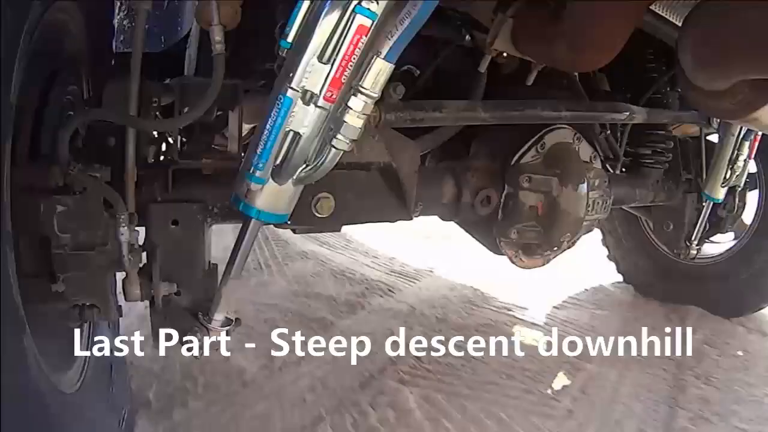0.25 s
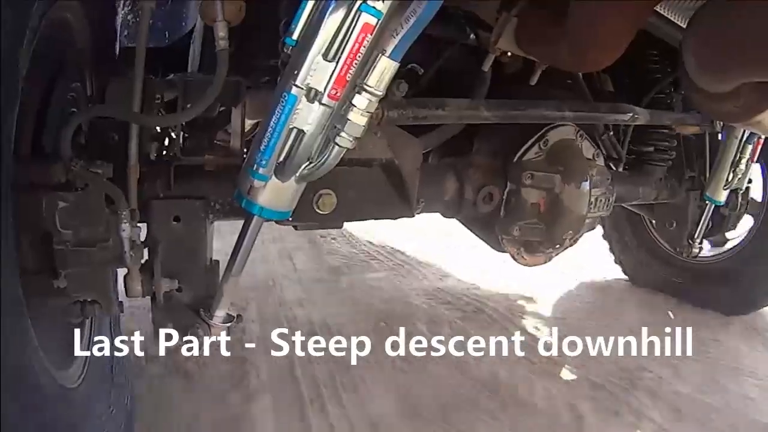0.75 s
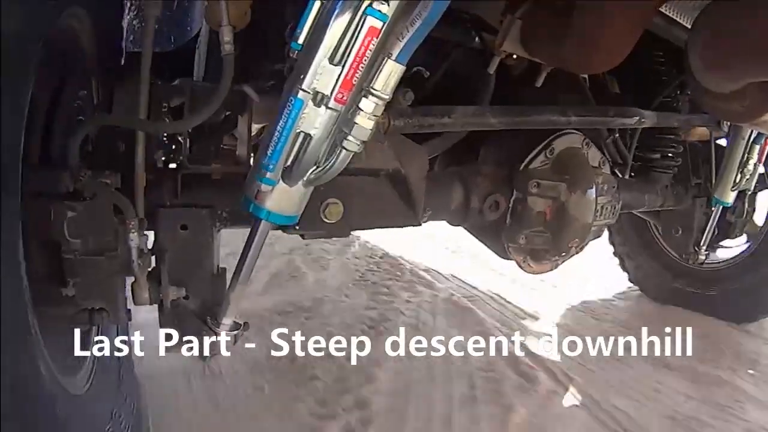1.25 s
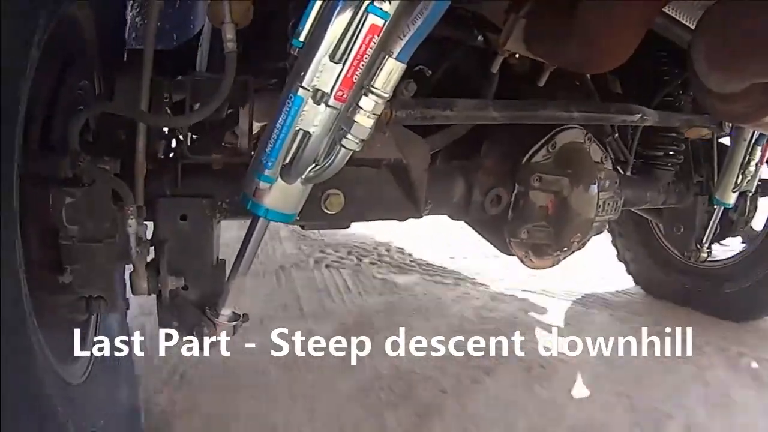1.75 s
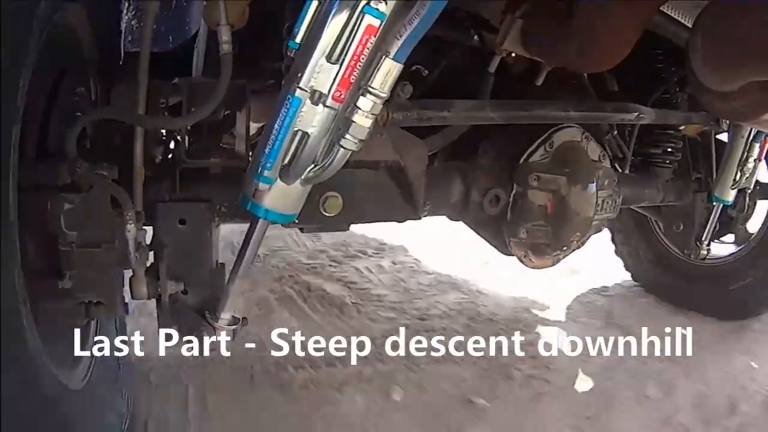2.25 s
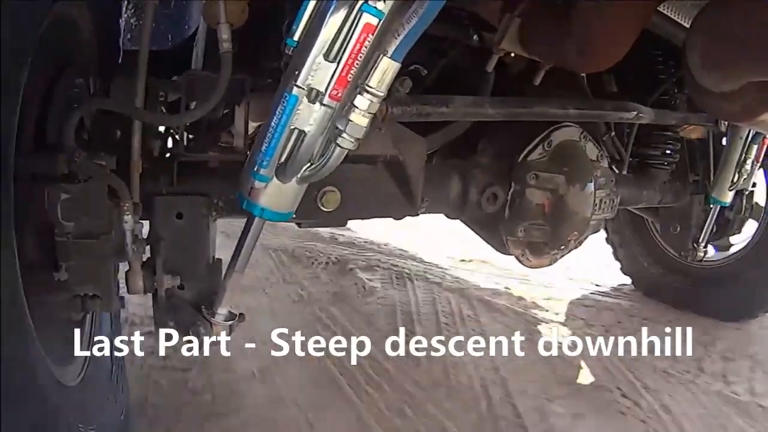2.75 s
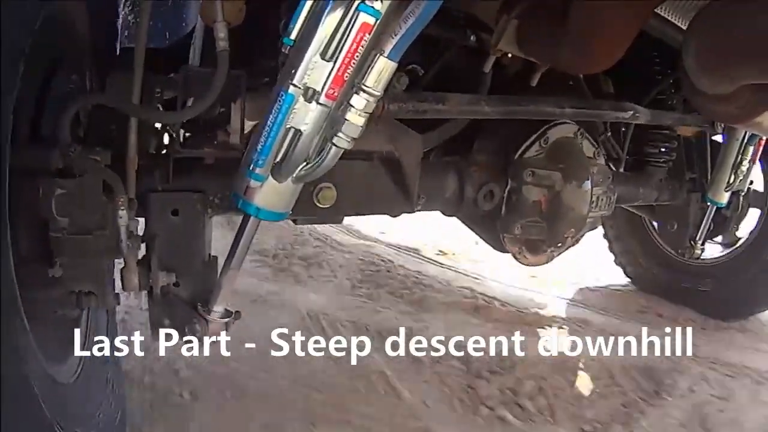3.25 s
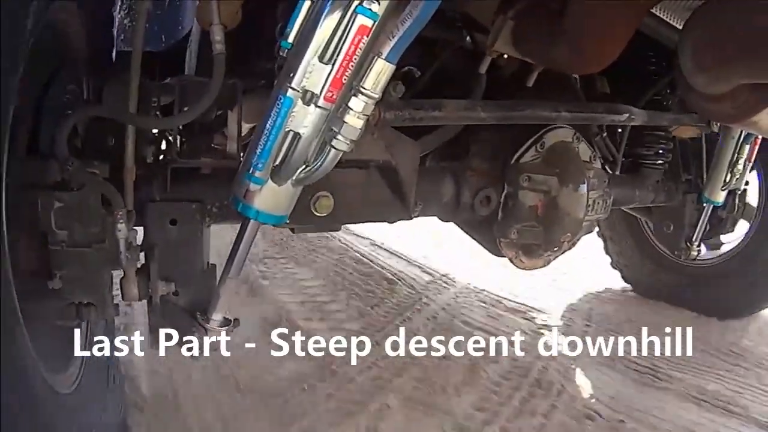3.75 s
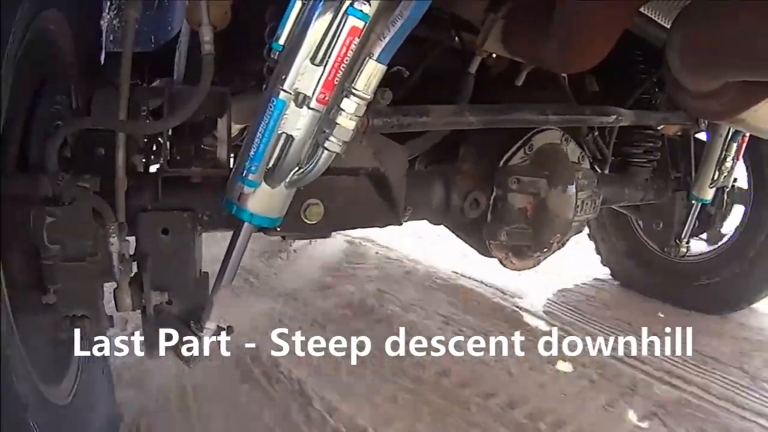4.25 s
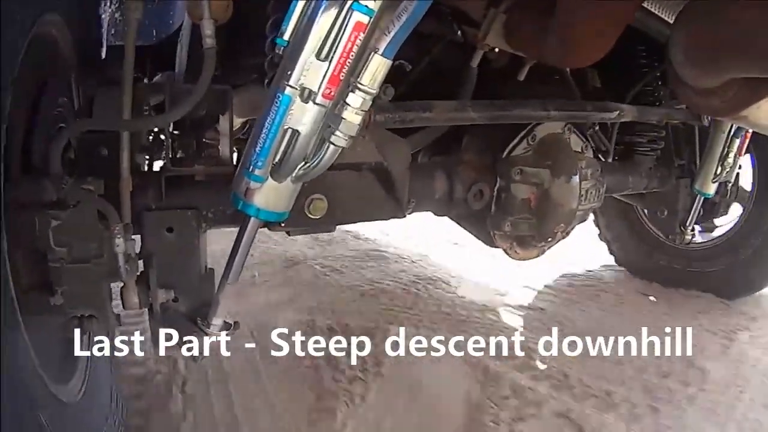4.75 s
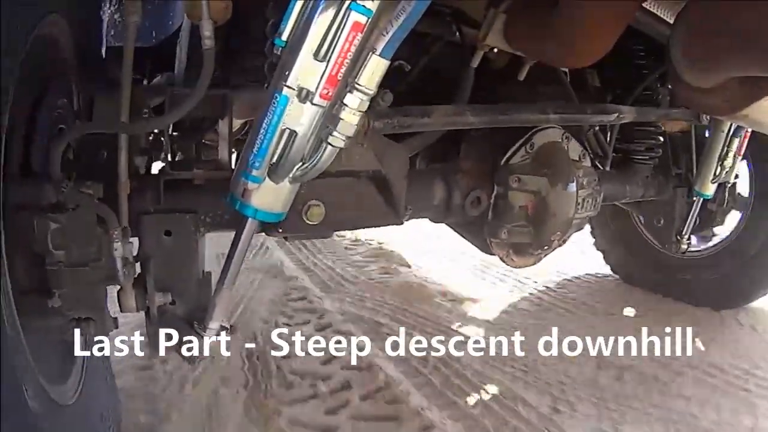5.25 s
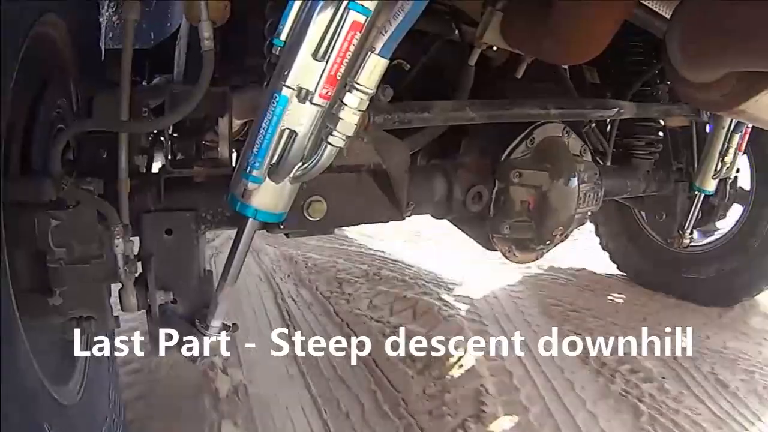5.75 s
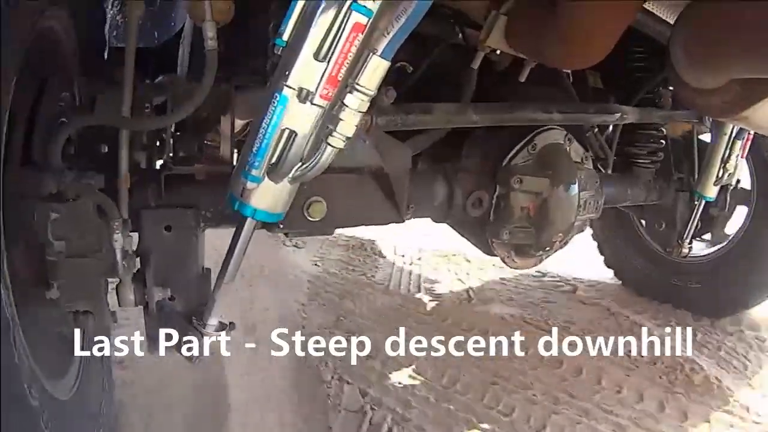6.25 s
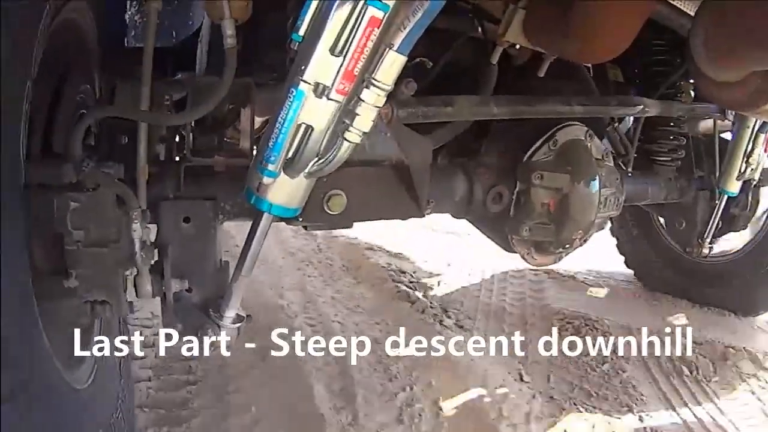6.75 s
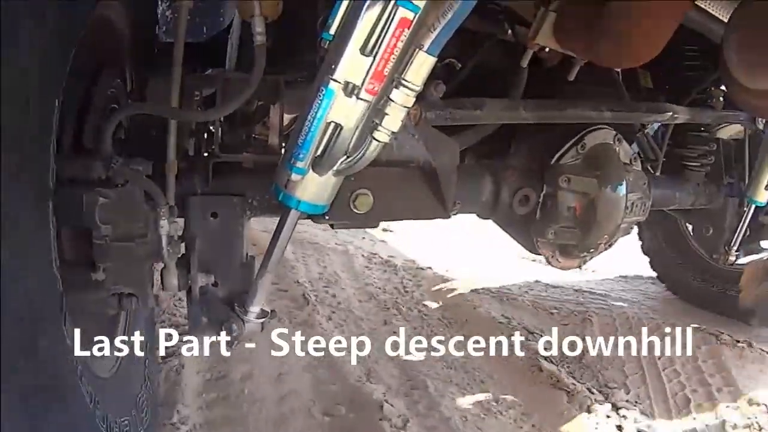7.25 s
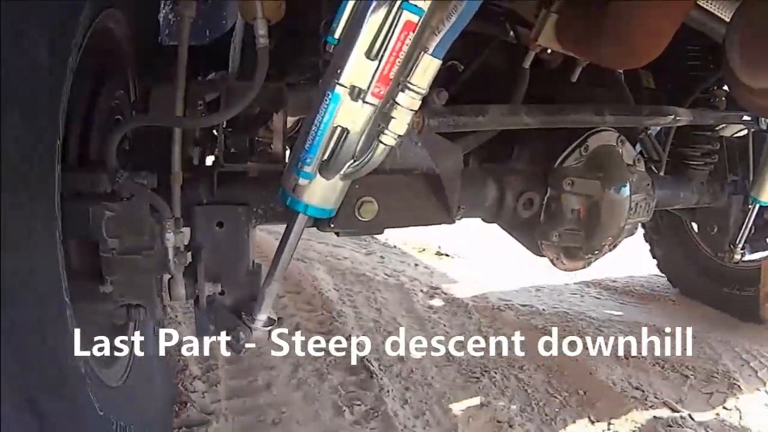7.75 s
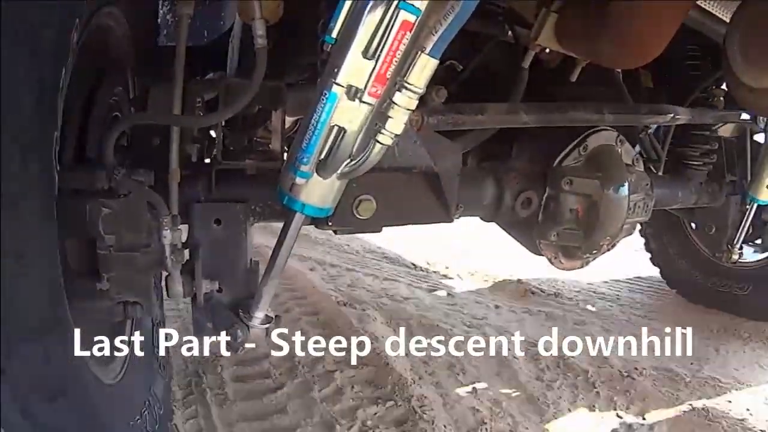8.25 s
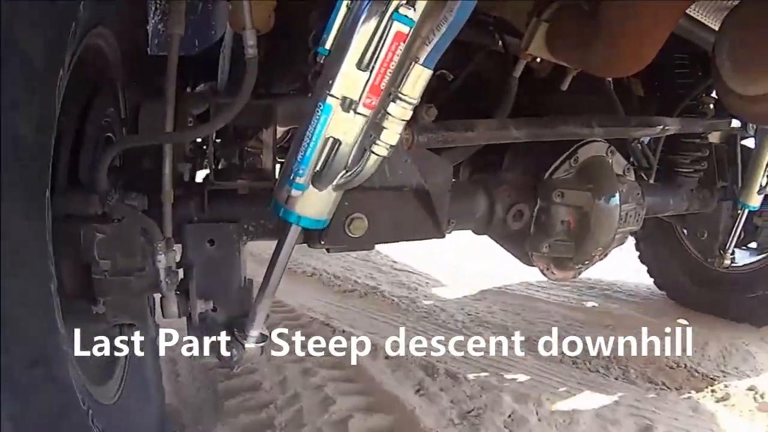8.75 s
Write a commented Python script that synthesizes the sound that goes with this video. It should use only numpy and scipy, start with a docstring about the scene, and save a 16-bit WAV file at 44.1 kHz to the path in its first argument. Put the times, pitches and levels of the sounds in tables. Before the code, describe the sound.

An underbody microphone catches a steady, buzzy engine drone and the dense rumble of tyres in dry sand. Sharp little grain ticks and dry rattles pepper the first half. Revs sink slowly, a throbbing tread drum takes over with metallic clanks, then a hushed near-idle moment with hollow tyre howl; a quick run of dull thumps brings the engine back up.

```python
"""Off-roader descending a dune

A six-cylinder off-roader runs down a sand dune, heard from a camera fixed under its body.
The engine drones as harmonics of its firing rate, sinks to idle and picks up again with a judder.
Tyres rumble and churn loose sand as filtered noise; drumming, howl and gear whines are unsteady tones.
Flung grains tick on the camera housing and the suspension knocks over the ruts as decaying modes."""
import sys
import numpy as np
from scipy import signal
from scipy.fft import rfft, irfft, next_fast_len
from scipy.io import wavfile
from scipy.ndimage import uniform_filter1d, map_coordinates

SR = 44100
rng = np.random.default_rng(int(sys.argv[2]) if len(sys.argv) > 2 else 0)


def file_out(sig):
    """Save sig as 16-bit WAV at sys.argv[1]."""
    # one column per channel
    cols = np.atleast_2d(sig).T
    # limit, then scale
    lim = np.clip(cols, -1, 1)
    pcm = np.round(lim * 32767).astype(np.int16)
    wavfile.write(sys.argv[1], SR, pcm)


N = 396884  # samples

# Engine speed. Each row: time in seconds, firings per second.
ENGINE_SPEED = [(0, 95), (.75, 100), (1.55, 104.4), (2.4, 104.4), (3, 101), (3.5, 92.5), (4, 85),
                (4.7, 76.3), (5.3, 72), (5.9, 62), (6.5, 42), (7.1, 31), (7.4, 36), (7.6, 38.3),
                (7.75, 41.3), (7.88, 42.5), (8.15, 62.5), (8.25, 71), (8.45, 77.5), (9, 79.6)]
# Engine load. Each row: time in seconds, exhaust boom in dB, overtones in dB.
ENGINE_LOAD = [(0, -29.5, -31.5), (.5, -22.5, -28), (1, -19.5, -29), (1.6, -18.5, -28), (1.9, -16.5, -39),
               (2.4, -21.5, -37), (3.5, -24, -39.5), (4.3, -37, -30), (5.2, -46, -31.5), (6, -35, -34.5),
               (6.5, -35, -44), (6.85, -54, -51), (7.2, -41, -48), (7.7, -52, -37), (8, -48, -45),
               (8.15, -31, -41), (8.3, -26, -30.5), (8.48, -20, -35), (9, -21.5, -30)]
# Engine overtones. Each row: multiple of the firing rate, relative level in dB.
ENGINE_OVERTONES = [(.5, -6), (1.5, 3), (2, -7), (2.5, -17), (3, -8.5), (3.5, -12), (4, -10), (4.5, -5.5),
                    (5, -9), (5.5, -18), (6, -6), (6.5, -17), (7.5, -16), (8, -16), (9, -24), (10.5, -27),
                    (11, -25), (12, -25)]
# Exhaust colour. Each row: frequency in Hz, gain in dB.
EXHAUST_COLOUR = [(30, -19), (80, -18.5), (220, -3.5), (330, 7.5), (390, -7), (460, 3), (540, -7.5),
                  (640, -24), (740, -3.5), (860, -19), (950, -3), (1060, 8.5), (1250, -8)]
# The gearbox sings as the engine holds the vehicle back.
# Each row: centre in seconds, length in seconds, multiple of the firing rate, level in dB.
OVERRUN_TONES = [(3.15, 0.55, 4.62, -35.5), (3.85, .5, 5.3, -41.5), (4.85, 0.94, 6.3, -39.5),
                 (5.35, .7, 4.65, -38)]
# Low overtones gain up to PULL_DB as the revs climb and lose it as they fall.
PULL_DB, PULL_HZ_PER_S = 4, 4.3
# A belt-driven accessory sings at the highest revs.
WHINE_S, WHINE_LENGTH_S, WHINE_DB = 1.88, 1.1, -39


def engine(firing_hz, phase, rough=0.08, whine_order=14.6, low_db=-3):
    """Harmonic synthesis: exhaust boom and overtones; unlike banks give the half orders."""
    boom_db, buzz_db = curves(ENGINE_LOAD)
    climb_hz_per_s = uniform_filter1d(np.gradient(curves(ENGINE_SPEED)[0]) * SR, SR // 4)
    pull_db = low_db + PULL_DB * np.tanh(climb_hz_per_s / PULL_HZ_PER_S)
    boom = amp(boom_db) * (1 + rough * wobble(23)) * np.sin(phase)
    buzz = np.zeros(N)
    for multiple, db in ENGINE_OVERTONES:
        load_db = buzz_db + pull_db if multiple <= 4 else buzz_db
        colour_db = along(EXHAUST_COLOUR, multiple * firing_hz)
        buzz += amp(load_db + db + colour_db) * partial(multiple * phase)
    whine = amp(WHINE_DB) * swell(WHINE_S, WHINE_LENGTH_S) * partial(whine_order * phase)
    overrun = np.zeros(N)
    for s, length_s, multiple, db in OVERRUN_TONES:
        overrun += amp(db) * swell(s, length_s) * partial(multiple * phase)
    return point(np.sqrt(2) * (boom + buzz + whine + overrun))


# The engine lugs at idle, then as it pulls away.
# Each row: centre in seconds, length in seconds, level in dB.
LUGGING_SPELLS = [(7.75, 1, -46), (8.037, 0.26, -32), (8.7, 0.99, -32)]
# Exhaust puffs. Each row: multiple of the firing rate, relative level in dB.
PUFF_MULTIPLES = [(2, 1), (4, -6), (7.5, -16)]


def lugging(phase):
    """Periodic excitation: low-rev exhaust puffs shake the body, so a few multiples stand out."""
    spells = sum(amp(db) * swell(s, length_s) for s, length_s, db in LUGGING_SPELLS)
    puffs = np.zeros(N)
    for multiple, db in PUFF_MULTIPLES:
        puffs += amp(db + wobble(6)) * np.sin(multiple * phase + rng.uniform(0, 2 * np.pi))
    return point(np.sqrt(2) * spells * puffs)


# Frame modes. Each row: frequency in Hz, relative level in dB, 60 dB decay time in seconds.
FRAME_MODES = [(132, -0.5, 0.052), (222, 3, .035), (298, 3, 0.047), (397, -11, 0.028), (543, 0.5, 0.028),
               (640, -5.5, 0.025)]
JUDDER_S, JUDDER_GAP_S = 8.179, .0147  # first blow, time between blows
# Level of the second, strongest blow; loss of its neighbours.
JUDDER_DB, JUDDER_ROUND_DB = -13.5, 2


def judder(count=4, scatter_db=0.5, attack_s=0.0017):
    """Impact response: taking up load, the engine rocks on the frame in a quick run of dull blows."""
    t = np.arange(SR // 12) / SR
    blows = np.zeros(N)
    for k in range(count):
        ring = struck(FRAME_MODES, t, scatter_db, detune=0.04, any_phase=True)
        level_db = JUDDER_DB - JUDDER_ROUND_DB * (k - 1) ** 2
        add(blows, JUDDER_S + k * JUDDER_GAP_S, amp(level_db) * ring * (1 - np.exp(-t / attack_s)))
    return point(blows)


# How hard the tyres roll. Each row: time in seconds, control level in dB.
ROLLING_LEVEL = [(0, -20.5), (1.2, -21), (2.15, -21), (2.8, -24), (4.1, -24.5), (6, -27.5), (6.8, -34.5),
                 (7.1, -30.5), (7.55, -36.5), (7.95, -36), (8.3, -30.5), (9, -26)]
# Churning under the tread. Each row: time in seconds, control level in dB.
CHURNING_LEVEL = [(0, -30), (.9, -30), (1.25, -32.5), (3.1, -34.5), (4.2, -32.5), (5.5, -32), (6.2, -37.5),
                  (6.65, -46.5), (7.1, -41.5), (7.5, -47.5), (8.4, -35), (9, -35.5)]
# Noise colours of low rumble, tyre rumble, churned sand and flung spray.
# Each row: frequency in Hz, relative density in dB per Hz.
LOW_RUMBLE_COLOUR = [(12, -19), (25, 4), (36, 6.5), (46, 15), (60, -3), (80, -10), (130, -77.5)]
TYRE_COLOUR = [(30, -44), (60, -14), (82, -2), (98, -3.5), (112, -1), (128, -1), (150, -5), (175, -6.5),
               (215, -5.5), (270, -7.5), (330, -9), (410, -20.5), (520, -20.5), (900, -85)]
CHURN_COLOUR = [(600, -48), (1000, -9.5), (1280, -15), (1450, -5.5), (1570, 1.5), (1700, -1.5), (1850, -8),
                (2100, -9), (2330, -16.5), (2650, -12.5), (2900, -20.5), (3250, -11), (3800, -28),
                (8000, -64)]
SPRAY_COLOUR = [(1300, -17), (2100, 15), (3200, 7.5), (4000, 1), (4700, 5), (5100, 15), (5500, 7),
                (6000, 6.5), (6700, 1.5), (7200, 5), (8200, -1), (9000, 0.5), (11000, -7.5)]
# Underbody panels. Each row: frequency in Hz, width in Hz, relative level in dB.
PANEL_MODES = [(464, 100, -9.5), (527, 67, -1.5), (628, 30.3, 4), (832, 49, -10.5), (985, 120, -16.5)]
# Four kinds of passing change: the low rumble swells or fades; the wheels throw up a fan of sand;
# sand scours the underbody; the churning briefly surges or eases.
# Each row: centre in seconds, length in seconds, level change in dB.
LOW_RUMBLE_SWELLS = [(2.55, .5, 6), (4.45, 0.78, -1), (6.1, 1.2, -0.5), (7.75, 1.5, -18), (8.6, 1.2, -3)]
SAND_FANS = [(0, 0.44, 4.5), (.85, 1, 2), (5.65, 0.69, 2), (9, 0.51, 5)]
SAND_SCRAPES = [(5.2, 0.084, 4.5), (5.88, 0.68, 4.5)]
CHURN_SURGES = [(2.99, 0.05, 2.5), (5.86, 0.068, -1), (5.945, 0.042, 6), (6.235, 0.033, 5),
                (8.21, 0.028, 6)]
CRUISE_ROLL_DB, CRUISE_SAND_DB = -25, -33  # both controls at cruising pace
# Each layer's base level at cruising pace in dB, and its growth in dB per dB of its control.
RUMBLE_DB, RUMBLE_GROWS = -20.5, 0.99
LOW_RUMBLE_DB, LOW_RUMBLE_GROWS = -32, 1.2
PANEL_DB, PANEL_GROWS = -33, 0.57
SPRAY_DB, SPRAY_GROWS = -46.5, 0.38
# Rumble below the first and above the second frequency fades faster as the tyres slow (dB per dB).
DEEP_HZ, DEEP_GROWS = 88.5, 0.42
BRIGHT_HZ, BRIGHT_GROWS = 325, 0.24


def tyres(phase, throb=0.039, churn_db=-2.0):
    """Broadband excitation: rolling shakes the body; churning sand rings its panels and sprays."""
    roll_db = curves(ROLLING_LEVEL)[0] - CRUISE_ROLL_DB
    sand_db = curves(CHURNING_LEVEL)[0]
    dig_db = sand_db - CRUISE_SAND_DB
    low_rumble_db = LOW_RUMBLE_DB + LOW_RUMBLE_GROWS * roll_db + swells(LOW_RUMBLE_SWELLS)
    low_rumble = amp(low_rumble_db) * coloured(LOW_RUMBLE_COLOUR)

    rolling = coloured(TYRE_COLOUR)
    deep = filtered(rolling, lambda hz: 1 / (1 + (hz / DEEP_HZ) ** 8))
    bright = filtered(rolling, lambda hz: 1 - 1 / (1 + (hz / BRIGHT_HZ) ** 16))
    middle = rolling - deep - bright
    deep_gain = amp(DEEP_GROWS * roll_db)
    bright_gain = amp(BRIGHT_GROWS * np.minimum(roll_db, 0))
    rumble_db = RUMBLE_DB + RUMBLE_GROWS * roll_db + 1.7 * wobble(22)
    rumble = amp(rumble_db) * (middle + deep_gain * deep + bright_gain * bright)

    unevenness = wobble(25)  # lumps of sand give way unevenly
    panel_db = PANEL_DB + PANEL_GROWS * dig_db + swells(SAND_SCRAPES) + 1.46 * unevenness
    panels = amp(panel_db) * rush(lambda hz: body(PANEL_MODES, hz))
    surge_db = swells(CHURN_SURGES) + 1.52 * unevenness + 0.53 * wobble(120)
    firing_throb = 1 + throb * np.sin(phase)
    churn = amp(sand_db + churn_db + surge_db) * firing_throb * coloured(CHURN_COLOUR)
    flicker_db = 1.3 * wobble(15) + 1.63 * wobble(200)
    spray_db = SPRAY_DB + SPRAY_GROWS * dig_db + swells(SAND_FANS) + flicker_db
    spray = amp(spray_db) * coloured(SPRAY_COLOUR)
    return low_rumble + rumble + panels + churn + spray


# The tread blocks drum. Each row: centre in seconds, length in seconds, level in dB.
DRUMMING_SPELLS = [(4.6, 1.18, -20.5), (5.455, 0.54, -24.5), (6.45, 0.77, -29.5), (7.2, 0.49, -43),
                   (7.92, 0.42, -28.5)]
TREAD_HZ = 113.5  # mean pitch


def tread(slip=0.038, depth_db=3):
    """Frequency modulation: the tread drums in spells, unsteady as the tyres grip and slip."""
    spells = sum(amp(db) * swell(s, length_s) for s, length_s, db in DRUMMING_SPELLS)
    turn = 2 * np.pi * np.cumsum(TREAD_HZ * (1 + slip * wobble(14))) / SR
    return point(spells * amp(depth_db * wobble(11)) * np.sin(turn))


# Tyre howl. Each row: time in seconds, mean pitch in Hz.
HOWL_PITCH = [(6.3, 250), (6.55, 268), (7, 255), (7.18, 278), (7.33, 253), (7.55, 246), (7.8, 228),
              (8, 226), (8.35, 255), (8.9, 275)]
HOWL_S, HOWL_LENGTH_S = 8, 3.4


def howl(howl_db=-3, slip=.015):
    """Frequency modulation: a hollow low-speed tyre howl that grows with the rolling."""
    turn = 2 * np.pi * np.cumsum(curves(HOWL_PITCH)[0] * (1 + slip * wobble(16))) / SR
    level = amp(curves(ROLLING_LEVEL)[0] + howl_db) * swell(HOWL_S, HOWL_LENGTH_S)
    return point(np.sqrt(2) * level * partial(turn))


# Breaking sand. Each row: frequency in Hz, width in Hz, relative level in dB.
CRUST_MODES = [(897, 176, 3.5), (1007, 180, 1), (1618, 150, 5.5), (2560, 100, -12.5)]
# Stretches of crusted sand. Each row: centre in seconds, length in seconds, level change in dB.
CRUSTED_STRETCHES = [(.4, 1.8, 4), (5, 2.2, 2)]


def crunch(rate=110, crunch_db=-11.0, spread_db=5):
    """Random impulse train: crusts of sand break under the tread in small, dull cracks."""
    chance, size = rng.random((2, N)), rng.uniform(-1.8, 1.6, (2, N))
    cracks = (chance < rate / SR) * np.sign(size) * amp(spread_db * np.abs(size))
    muffle = lambda hz: amp(along([(2500, 0), (4500, -18), (9000, -45)], hz))
    dull = filtered(cracks, lambda hz: resonances(CRUST_MODES, hz) * muffle(hz))
    level_db = curves(CHURNING_LEVEL)[0] + crunch_db + swells(CRUSTED_STRETCHES)
    return amp(level_db) * unit(dull)


# Suspension knocks. Each row: start in seconds, relative clank level in dB, relative thud level in dB.
SUSPENSION_KNOCKS = [(2.09, -41, -15), (2.186, -36, -16), (3.8, -35, -19), (4.17, -32, -18.5),
                     (4.59, -24, -41), (4.675, -30, -16), (4.84, -36, -23), (5.256, -22, -17),
                     (5.755, -17, -36), (5.875, -20, -27), (5.931, -22.5, -21), (6.003, -32, -15),
                     (6.504, -34, -24), (6.624, -35, -19), (6.715, -36, -32), (7.156, -21.5, -39)]
# Struck steel. Each row: frequency in Hz, relative level in dB, 60 dB decay time in seconds.
STEEL_MODES = [(510, -6.5, 0.14), (632, 7.5, 0.069), (810, -6, 0.035)]
# Axle. Each row: frequency in Hz, width in Hz, relative level in dB.
AXLE_MODES = [(114, 19.5, 8), (155, 35, 4), (286, 41, 7.5)]
# A loose joint strikes again after about this long, this much weaker.
BOUNCE_S, BOUNCE_LOSS_DB = .014, 6.5


def knocks(thud_db=12, thud_t60=.02, scatter_db=2, count=3):
    """Modal impact: joints strike and bounce; the steel rings and a push shakes the axle."""
    t = np.arange(SR // 8) / SR
    clanks, thuds = np.zeros((2, N))
    onset = 1 - np.exp(-t / 0.0044)
    for start, clank_db, push_db in SUSPENSION_KNOCKS:
        for k in range(count):
            s = start + k * BOUNCE_S * rng.normal(1, 0.134)
            loss_db = k * BOUNCE_LOSS_DB
            ring = struck(STEEL_MODES, t, scatter_db, detune=0.015)
            add(clanks, s, amp(clank_db - loss_db) * ring * onset)
            add(thuds, s, amp(push_db - loss_db + thud_db - 60 * t / thud_t60))
    return point(clanks + filtered(thuds, lambda hz: resonances(AXLE_MODES, hz)))


# Grains on the housing. Each row: start in seconds, relative ring level in dB, relative crack level in dB.
GRAIN_TICKS = [(0.4076, -20, -40), (0.6624, -31, -58), (0.7328, -48, -37), (0.821, -16, -40.5),
               (0.873, -17.5, -38), (0.9202, -19, -35.5), (1.299, -28.5, -56), (1.3937, -29, -49),
               (1.4386, -28, -51), (1.5184, -32, -52), (1.8577, -25.5, -45), (1.8763, -22, -39.5),
               (1.922, -23, -50), (2.0128, -31, -56), (2.332, -22, -46), (2.4354, -31, -54),
               (2.4832, -33, -33.5), (2.4967, -24, -44), (2.7263, -27, -46), (2.834, -19.5, -43),
               (2.8787, -28.5, -55), (2.927, -28.5, -60), (3.0632, -33, -43), (3.2964, -28.5, -47),
               (3.3378, -32, -57), (3.4016, -21, -46), (3.687, -33, -59), (3.7287, -28, -54),
               (3.7599, -33, -53), (3.7753, -22, -40), (3.8127, -35, -58), (3.8661, -30, -58),
               (4.0545, -17.5, -42), (4.1158, -23, -47), (4.1774, -38, -58), (4.2103, -28.5, -46),
               (4.259, -30, -49), (4.3101, -32, -62), (6.099, -46, -44), (6.335, -50, -48),
               (6.974, -26.5, -48), (7.1242, -31, -61), (7.365, -55, -44), (7.958, -55, -46)]
# Camera housing. Each row: frequency in Hz, relative level in dB, 60 dB decay time in seconds.
HOUSING_MODES = [(2440, -3, 0.011), (3110, -0.5, 0.007), (4180, -11.5, 0.013), (4900, -13.5, 0.021),
                 (5140, 2.5, 0.013), (6240, -13, 0.01)]
# Colour of a grain's crack. Each row: frequency in Hz, gain in dB.
CRACK_COLOUR = [(2000, 0), (5200, 2), (8000, -1.5), (11000, -6)]
RING_DB, CRACK_DB, CRACK_T60_S, TICK_ATTACK_S = 2.5, 15.5, 0.0058, 0.00029
FAST_UNTIL_S = 3.3  # fine grains fly until the wheels slow down


def grit(count=36, fine_db=-39, spread_db=5, fine_crack_db=-18, detune=0.0057):
    """Modal impact: each grain cracks on the housing and rings it; fine ones fly at speed."""
    t = np.arange(SR // 25) / SR
    rings, cracks = np.zeros(N), np.zeros((2, N))
    fine = []
    for when, size in rng.random((count, 2)):
        db = fine_db + spread_db * (2 * size - 1)
        fine.append((FAST_UNTIL_S * when, db, db + fine_crack_db))
    onset = 1 - np.exp(-t / TICK_ATTACK_S)
    for s, db, snap_db in list(GRAIN_TICKS) + fine:
        ring = struck(HOUSING_MODES, t, 1.65, detune)
        add(rings, s, amp(db + RING_DB) * ring * onset)
        decay = amp(snap_db + CRACK_DB - 60 * t / CRACK_T60_S)
        for part in cracks:
            add(part, s, decay * rng.standard_normal(len(t)) * onset)
    return filtered(cracks, lambda hz: amp(along(CRACK_COLOUR, hz))) + point(rings)


# The bracket clacks. Each row: start in seconds, relative level in dB.
BRACKET_CLACKS = [(1.898, -34), (1.96, -30), (1.998, -37), (2.066, -31), (2.094, -30.5), (2.124, -24.5),
                  (2.185, -27.5), (2.229, -26.5), (2.281, -30.5), (2.357, -30), (2.412, -32), (2.456, -30),
                  (2.508, -30.5), (2.57, -34.5), (2.619, -36), (2.687, -27), (2.745, -35), (2.96, -26),
                  (3.017, -36), (3.315, -33), (3.376, -30), (4.15, -32), (5.11, -32), (5.51, -31),
                  (5.55, -36), (5.6, -34)]
# Bracket. Each row: frequency in Hz, width in Hz, relative level in dB.
BRACKET_MODES = [(800, 130, -2.5), (950, 120, 4.5), (1170, 190, -2), (1600, 240, -3)]


def rattling(clack_db=-8, attack_s=.003, t60=0.042):
    """Damped contact: a loose bracket clacks over the ripples in short, dry, toneless bursts."""
    t = np.arange(SR // 25) / SR
    shape = (1 - np.exp(-t / attack_s)) * amp(-60 * t / t60)
    clacks = np.zeros((2, N))
    for part, ringing in zip(clacks, rush(lambda hz: body(BRACKET_MODES, hz))):
        for s, db in BRACKET_CLACKS:
            burst = unit(ringing[round(s * SR):][:len(t)] * shape)
            add(part, s, amp(db + clack_db) * burst)
    return clacks


def clatter(phase, clatter_db=-7, scatter=0.29, count=6):
    """Impulse response: firings tap the block, unequal by cylinder; level follows the churning."""
    at = np.flatnonzero(np.diff(np.floor(phase / (2 * np.pi))))
    cylinders = np.resize(rng.standard_normal(count), len(at))
    taps = np.zeros(N)
    taps[at] = cylinders + scatter * rng.standard_normal(len(at))
    t = np.arange(SR // 50) / SR
    ring = signal.fftconvolve(taps, rng.standard_normal(len(t)) * np.exp(-t / 0.021))[:N]
    tinted = unit(filtered(ring, lambda hz: amp(along(CHURN_COLOUR, hz))))
    return point(amp(curves(CHURNING_LEVEL)[0] + clatter_db) * tinted)


# Drivetrain whine at a crawl. Each row: time in seconds, pitch in Hz.
GEAR_PITCH = [(6.8, 345), (6.92, 358), (7.02, 385), (7.1, 420), (7.16, 422), (7.22, 385), (7.3, 352),
              (7.42, 335), (7.55, 345), (7.66, 372), (7.78, 372), (7.9, 335)]
GEAR_S, GEAR_LENGTH_S, GEAR_DB = 7.35, 1.2, -39.5
# Another gear pair: its pitch over the first, its level against it.
SECOND_MESH, SECOND_MESH_DB = .815, -6
# A wavering whistle, and a thin steady whine as of a pump; levels relative to the churning control.
WHISTLE_HZ, WHISTLE_WANDER_HZ, WHISTLE_DB = 1616, 54.95, -6
THIN_HZ, THIN_DB = 2690, -22
SING_S, SING_LENGTH_S, SING_HZ, SING_DB = 5.15, 0.49, 850, -40.5  # a panel sings briefly


def whines():
    """Narrow-band tones: two gear meshes at a crawl, a whistle, a thin whine, a panel."""
    turn = 2 * np.pi * np.cumsum(curves(GEAR_PITCH)[0]) / SR
    meshes = np.sqrt(2) * (np.sin(turn) + amp(SECOND_MESH_DB) * np.sin(SECOND_MESH * turn))
    gear = amp(GEAR_DB + 1.6 * wobble(10)) * swell(GEAR_S, GEAR_LENGTH_S) * meshes
    sand_db = curves(CHURNING_LEVEL)[0]
    whistle_tone = wavering(WHISTLE_HZ, WHISTLE_WANDER_HZ, rate=19)
    whistle = amp(sand_db + WHISTLE_DB + 1.9 * wobble(14)) * whistle_tone
    thin_tone = wavering(THIN_HZ, wander_hz=7.8, rate=15)
    thin = amp(sand_db + THIN_DB + 3.4 * wobble(6.9)) * thin_tone
    panel_tone = wavering(SING_HZ, wander_hz=24, rate=45)
    panel = amp(SING_DB) * swell(SING_S, SING_LENGTH_S) * panel_tone
    return point(gear + whistle + thin + panel)


def partial(phase, flutter_db=2, waver_rad=.3):
    """Amplitude and phase modulation: one tone whose level and phase wander."""
    wander = waver_rad * wobble(13)
    return amp(flutter_db * wobble(11)) * np.sin(phase + wander + rng.uniform(0, 2 * np.pi))


def wavering(hz, wander_hz, rate):
    """Frequency modulation: a tone of rms 1 whose pitch wanders, rate knots a second."""
    return np.sqrt(2) * np.sin(2 * np.pi * np.cumsum(hz + wander_hz * wobble(rate)) / SR)


def struck(modes, t, scatter_db, detune, any_phase=False):
    """Modal superposition: decaying sines, each strike scattering their levels and pitches."""
    ring = np.zeros(len(t))
    for hz, db, t60 in modes:
        decay = amp(db + rng.normal(0, scatter_db) - 60 * t / t60)
        start_turn = rng.random() if any_phase else 0
        ring += decay * np.sin(2 * np.pi * (hz * rng.normal(1, detune) * t + start_turn))
    return ring


def resonances(modes, f):
    """Linear resonance: causal response of (Hz, width Hz, dB) modes of alternating sign."""
    response = 0
    for k, (centre, width, db) in enumerate(modes):
        damping = 1j * f * width
        response = response + (-1) ** k * amp(db) * damping / (centre * centre - f * f + damping)
    return response


def body(modes, hz):
    """Power summation: broadly shaken modes add in power, with steep skirts."""
    return np.sqrt(sum((amp(db) / (1 + ((hz - c) / w) ** 2)) ** 2 for c, w, db in modes))


def rush(response):
    """Spectral shaping: two unrelated noises in one colour, rms 1 over both."""
    return unit(filtered(rng.standard_normal((2, N)), response))


def coloured(spectrum):
    """Spectral shaping: two unrelated noises of rms 1, from (Hz, dB) points."""
    return rush(lambda hz: amp(along(spectrum, hz)))


def swell(s, length_s, edge_db=9):
    """Gaussian envelope: 1 at time s, edge_db down at both ends of its length."""
    return amp(-edge_db * (2 * (np.arange(N) / SR - s) / length_s) ** 2)


def swells(rows):
    """Level addition: the dB that (centre s, length s, dB) swells add."""
    return sum(db * swell(s, length_s) for s, length_s, db in rows)


def wobble(rate):
    """Band-limited randomness: a smooth random curve, rate knots a second."""
    knots = rng.standard_normal(int(N * rate / SR) + 4)
    return map_coordinates(knots, [np.arange(N) * rate / SR])


def curves(rows):
    """Linear interpolation: one value per sample for each column after the time."""
    s, *cols = np.transpose(rows)
    return [np.interp(np.arange(N) / SR, s, c) for c in cols]


def along(points, hz):
    """Logarithmic frequency scale: interpolates (Hz, value) points."""
    f, v = np.transpose(points)
    return np.interp(np.log(hz + 1), np.log(f + 1), v)


def amp(db):
    """Decibel law: level to amplitude."""
    return 10 ** (np.asarray(db) / 20)


def unit(x):
    """Normalisation: scales to rms 1."""
    return x / np.sqrt(np.mean(x ** 2) + 1e-20)


def filtered(x, response):
    """Convolution theorem: multiplies the spectrum by a response of frequency in Hz."""
    m = next_fast_len(N + SR // 2)
    return irfft(rfft(x, m) * response(np.fft.rfftfreq(m, 1 / SR)), m)[..., :N]


def add(track, s, sound):
    """Superposition: mixes a sound in at time s."""
    part = track[max(round(s * SR), 0):][:len(sound)]
    part += sound[:len(part)]


def point(x):
    """Quadrature: a single source becomes two parts a quarter cycle apart."""
    return np.array([x, filtered(x, lambda hz: 1j)])


# Likeness of the ports. Each row: frequency in Hz, left-right likeness from -1 to 1.
PORT_LIKENESS = [(25, 1), (60, 0.92), (120, 0.97), (165, 0.96), (205, -0.25), (300, -0.97), (400, -0.59),
                 (480, 0.14), (640, 0.59), (1000, 0.047), (1550, 0.89), (2200, 0.61), (3300, -0.13),
                 (5000, 0.84), (11000, 0.96)]
# Balance of the ports. Each row: frequency in Hz, left minus right gain in dB.
PORT_BALANCE = [(30, -4), (100, 5.5), (150, 1.5), (230, -8), (330, -1), (460, 4), (530, -6.5), (630, 1.5),
                (860, 0), (1060, 4), (1600, 2), (2800, 1), (4000, -2.5), (6000, 0)]


def ports(a, b):
    """Interchannel coherence: left and right from an in-phase part a and an opposed part b."""
    turn = lambda hz: np.arccos(np.clip(along(PORT_LIKENESS, hz), -1, 1)) / 2
    split = lambda hz: np.array([np.cos(turn(hz)), np.sin(turn(hz))])
    mid, side = filtered(np.array([a, b]), split)
    balance = lambda hz: amp(np.outer([.5, -.5], along(PORT_BALANCE, hz)))
    return filtered(np.array([mid + side, mid - side]), balance)


def scene():
    """Superposition: everything under the vehicle meets at the camera's two ports."""
    firing_hz = curves(ENGINE_SPEED)[0] * (1 + 0.002096 * wobble(10))
    phase = 2 * np.pi * np.cumsum(firing_hz) / SR
    drive = engine(firing_hz, phase) + lugging(phase) + clatter(phase) + whines() + judder()
    ground = tread() + howl() + tyres(phase) + crunch() + grit() + knocks() + rattling()
    return ports(*(drive + ground))


CEILING, TOP_HZ = .9, 11200  # peak limit (full scale 1), band limit


def record(dry, order=6):
    """Saturation and band limiting: the highest peaks are rounded and the band ends at TOP_HZ."""
    rounded = dry / (1 + np.abs(dry / CEILING) ** order) ** (1 / order)
    return filtered(rounded, lambda hz: hz < TOP_HZ)


dry = scene()
out = record(dry)
file_out(out)
```